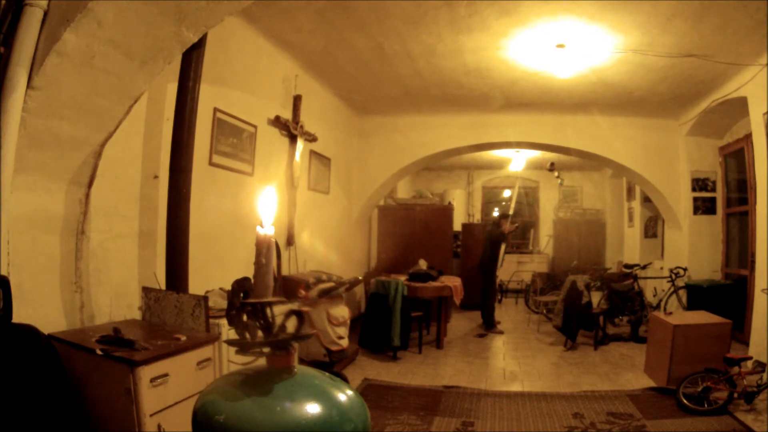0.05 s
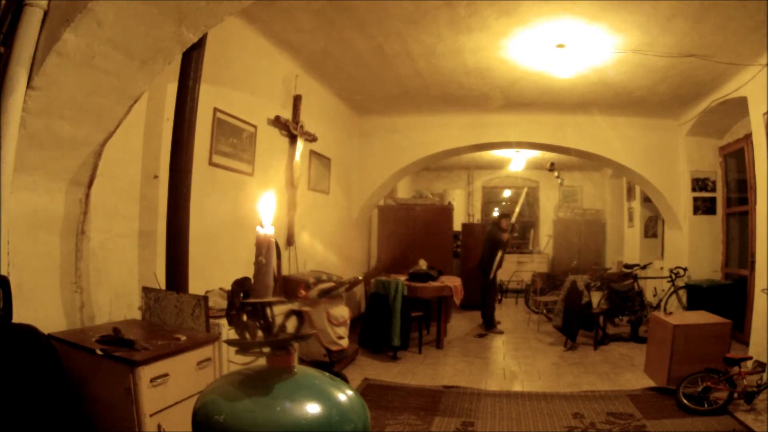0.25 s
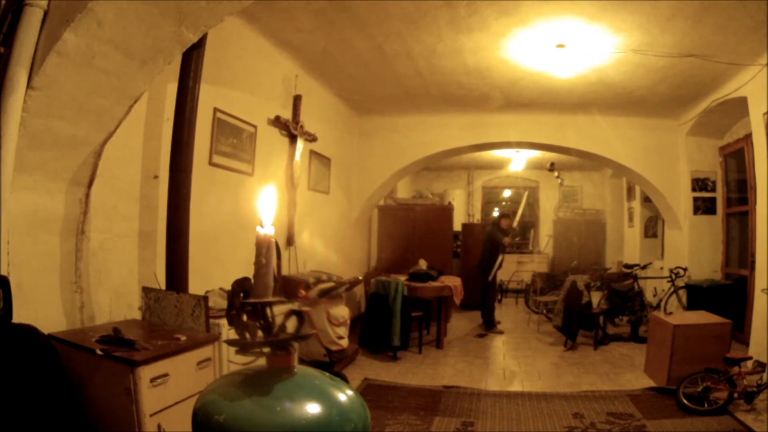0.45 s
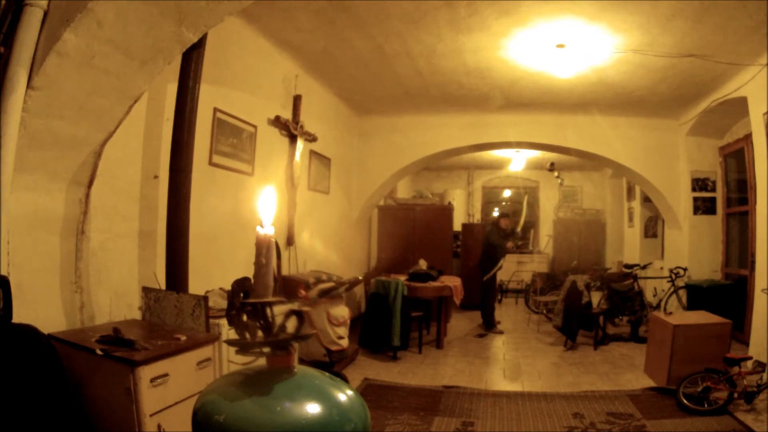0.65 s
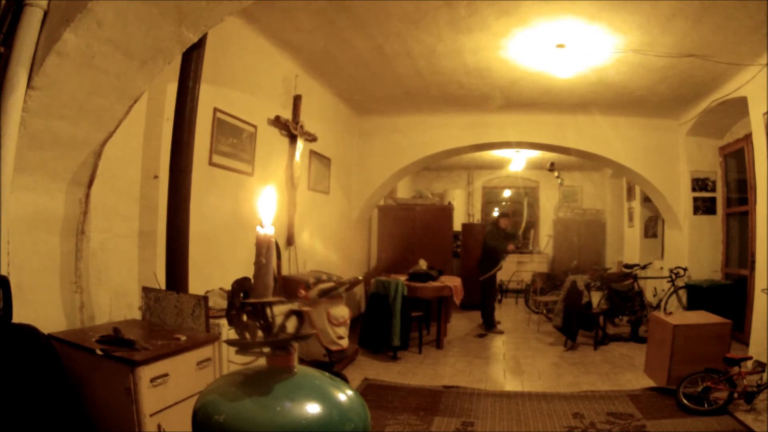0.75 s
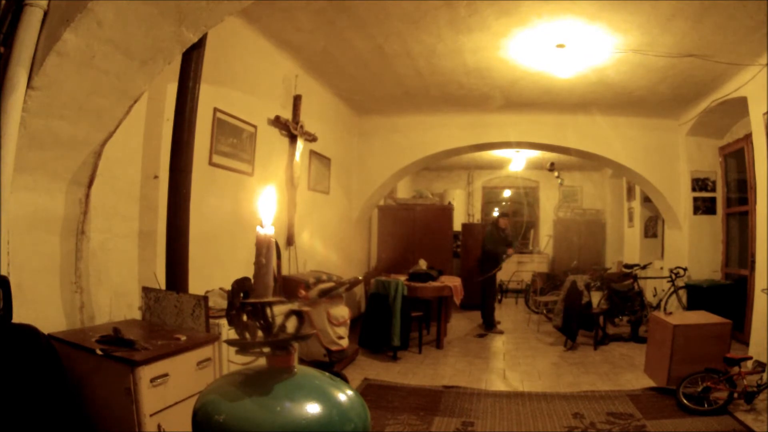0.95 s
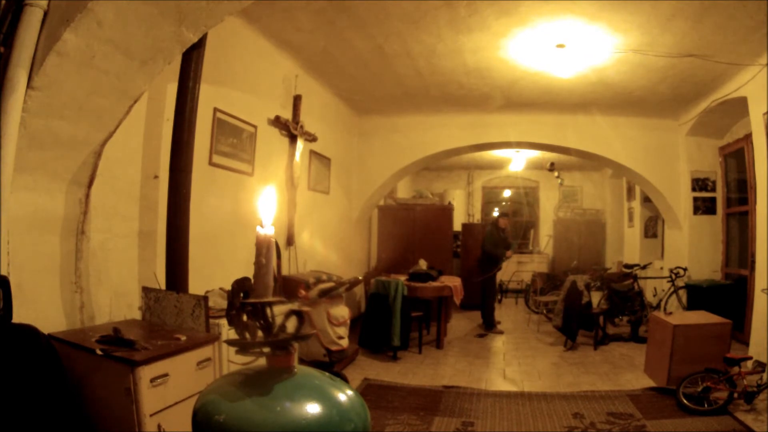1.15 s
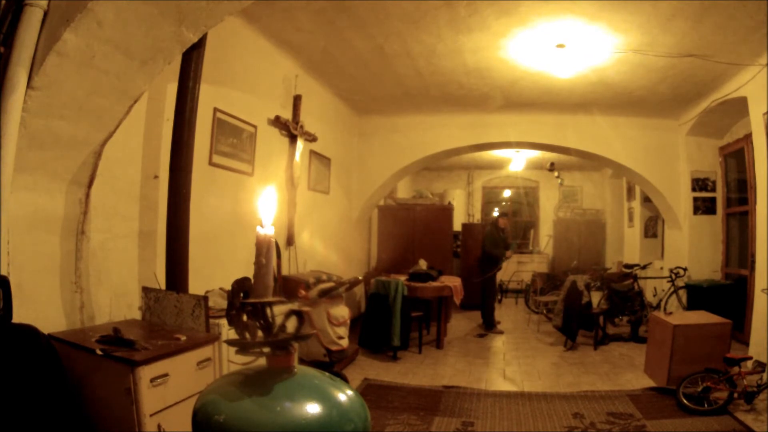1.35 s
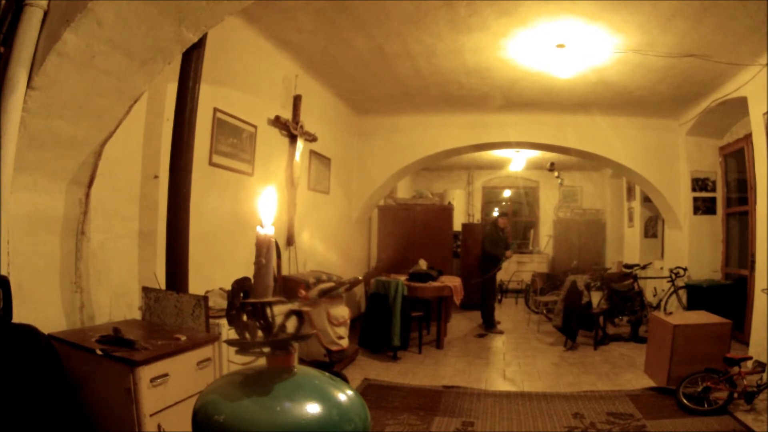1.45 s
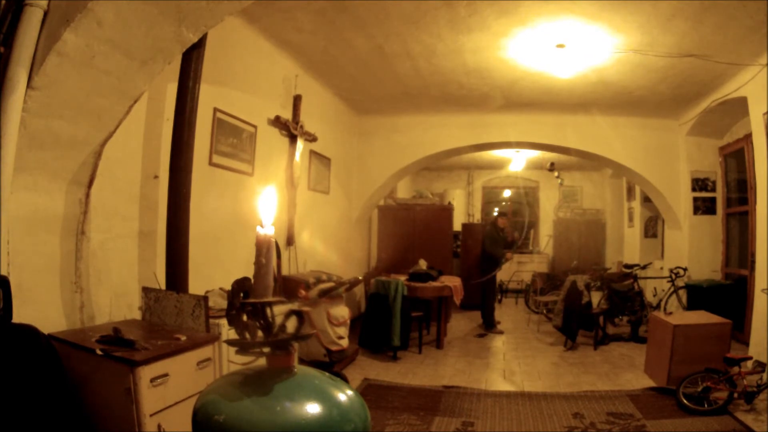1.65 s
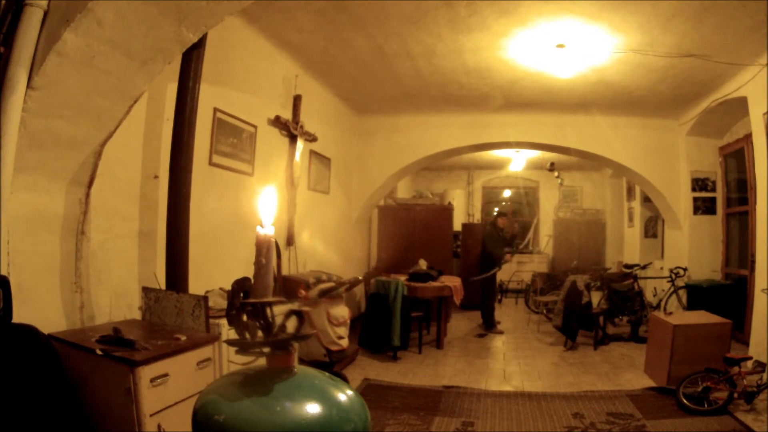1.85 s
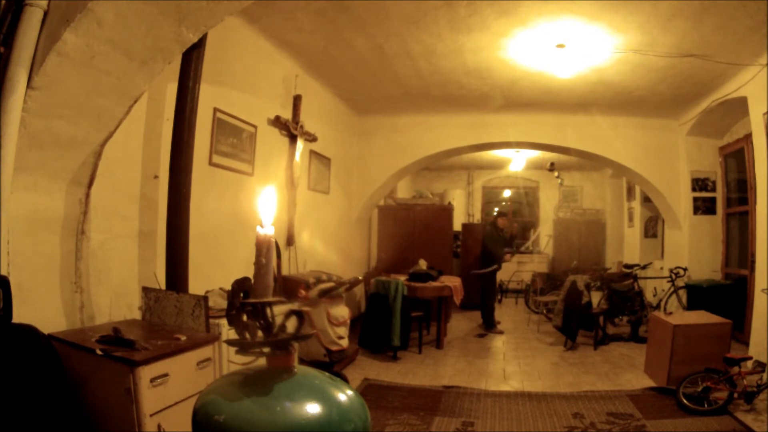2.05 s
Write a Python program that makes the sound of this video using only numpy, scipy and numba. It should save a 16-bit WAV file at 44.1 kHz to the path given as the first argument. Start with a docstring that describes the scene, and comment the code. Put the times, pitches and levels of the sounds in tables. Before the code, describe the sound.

Arrow strike: a soft far bowstring snap, then a loud close woody crack, room echo, faint footfalls and rustling

```python
"""An arrow strikes a target close to the microphone: noise crack, ringing board, echoes of a large stone room.
Before it, the bow at the far end: the arrow scraping along the rest and the string's snap as shaped noise,
limbs and shaft as damped sines. The hit overloads the recorder, whose gain control holds the echo down for a
moment. Then soft footfalls (noise thuds) with a deep wobble (slow sines), and rustling clothes and gear (grainy
noise), over faint steady room noise."""
import sys
import numpy as np
from scipy import signal
from scipy.fft import rfft, irfft
from scipy.io import wavfile
from scipy.ndimage import uniform_filter1d
from numba import njit

SR = 44100
rng = np.random.default_rng(int(sys.argv[2]) if len(sys.argv) > 2 else 0)


def transcribe(signal):
    """Save signal, clipped to [-1, 1], as a 16-bit WAV file at the path in sys.argv[1]."""
    frames = np.atleast_2d(signal).T
    limited = np.clip(frames, -1, 1)
    pcm = np.round(limited * 32767).astype(np.int16)
    wavfile.write(sys.argv[1], SR, pcm)


N = 92610
T = np.arange(N) / SR
FREQS_HZ = np.maximum(np.arange(N // 2 + 1) * SR / N, 1)

HIT_S, TARGET_LOW_HZ = .2315, 60  # the board radiates little below this
CRACK_DB, CRACK_RISE_S, CRACK_HOLD_S, CRACK_T60_S = -3, .0004, .0028, .011
ECHO_DB = -18
ROOM_GAP_S, ROOM_BUILD_S, ROOM_HOLD_S = .003, .0053, .018
# crack spectrum: f/Hz, relative level/dB per Hz
CRACK_SPECTRUM = [(150, -20), (500, -7.5), (1200, -4), (2600, -3.5), (3300, -13), (5200, -12), (10000, -15),
                  (15000, -19)]
# target board modes: f/Hz, level/dB, t60/s
BOARD_MODES = [(108, -23, 0.09), (239, -13, .08), (313, -21, 0.079), (590, -7, .03), (733, -2.5, .03),
               (850, -3, 0.036), (992, -11.5, 0.042), (1460, -5.5, 0.026), (1880, -5.5, .022),
               (2725, -9.5, 0.014), (3690, -15.5, .02), (5179, -9.5, 0.024), (6600, -15, 0.014),
               (10000, -19, .016)]
# hit echo spectrum: f/Hz, relative level/dB per Hz
ECHO_SPECTRUM = [(35, -27.5), (80, -8), (125, -4.5), (170, -6.5), (230, -1.5), (305, -1), (410, -9),
                 (560, -4), (850, -0.5), (940, -8), (1150, -5), (1550, -9.5), (2000, -7.5), (2400, -16),
                 (3300, -19), (5200, -20), (7500, -25.5), (10500, -23.5), (15000, -26)]
# standing waves of the room: f/Hz, level/dB, t60/s
STANDING_WAVES = [(127, -31.5, .55), (241.6, -33, .9), (299.5, -29.5, 0.92), (571, -32.5, 0.52),
                  (753, -33.5, .7)]


def arrow_hit():
    """The point crunches in for a few milliseconds, the board rings and the whole room answers."""
    crack_env = envelope(HIT_S, CRACK_RISE_S, CRACK_HOLD_S, CRACK_T60_S)
    crack = undb(CRACK_DB) * noise(CRACK_SPECTRUM) * crack_env
    board = ring(BOARD_MODES, HIT_S, CRACK_RISE_S)
    highpass = signal.butter(2, TARGET_LOW_HZ, "high", fs=SR, output="sos")
    direct = signal.sosfilt(highpass, crack + board)
    echo = undb(ECHO_DB) * echoes(noise(ECHO_SPECTRUM), HIT_S)
    standing = ring(STANDING_WAVES, HIT_S + ROOM_GAP_S, ROOM_BUILD_S)
    return direct + echo + standing


SLIP_S, SLIP_DB, SLIP_RISE_S, SLIP_T60_S = .053, -41, .0025, .02
LOOSE_S, LOOSE_DB, LOOSE_RISE_S, LOOSE_T60_S = .072, -24.5, .011, .12
BOW_WET_DB, BOW_RING_WET_DB = 2, -3.5
# scrape of the arrow along the rest: f/Hz, relative level/dB per Hz
SLIP_SPECTRUM = [(60, -9), (170, -1), (300, -8.5), (550, -2.5), (900, -12.5), (2200, -9), (4500, -15),
                 (9000, -19.5), (12000, -29), (14500, -22)]
# snap spectrum at the bow: f/Hz, relative level/dB per Hz
SNAP_SPECTRUM = [(35, -28.5), (80, -6), (160, -0.5), (300, -3), (470, 1.5), (620, -11), (1200, -11.5),
                 (1600, -13), (2100, -10), (3000, -16.5), (5300, -15), (8400, -20.5), (10000, -23),
                 (12000, -30), (14500, -26)]
# limbs, string and shaft, before path and room: f/Hz, level/dB, t60/s
LIMB_MODES = [(109, -39.5, .3), (162.4, -38, 0.39), (240, -40.5, .3), (463, -37.5, 0.13), (1950, -36, .08),
              (2440, -40, 0.1), (2980, -41, .06), (3585, -29.5, .06), (5400, -42.5, .05),
              (8440, -33.5, .045)]
# straight path from snap and limbs to microphone: f/Hz, gain/dB
DIRECT_PATH = [(100, -2.5), (300, -8), (900, -9.5), (1600, -5), (2000, 0), (3600, 1), (5000, -0.5),
               (8500, -0.5), (12000, -5), (15000, -1.5)]


def bow():
    """The arrow scrapes along the rest, the string snaps home and rings limbs and shaft; heard direct and via
    the room."""
    slip_env = envelope(SLIP_S, SLIP_RISE_S, LOOSE_S - SLIP_S, SLIP_T60_S)
    slip = undb(SLIP_DB) * slip_env * noise(SLIP_SPECTRUM)
    snap_env = envelope(LOOSE_S, LOOSE_RISE_S, 0, LOOSE_T60_S)
    snap = undb(LOOSE_DB) * snap_env * noise(SNAP_SPECTRUM)
    limbs = ring(LIMB_MODES, LOOSE_S, LOOSE_RISE_S)
    direct = slip + tint(snap + limbs, DIRECT_PATH)
    room_send = undb(BOW_WET_DB) * (slip + snap) + undb(BOW_RING_WET_DB) * limbs
    return direct + reverb(room_send)


STEP_RISE_S, STEP_T60_S, STEP_WET_DB = .0075, .18, -4
SWAY_HZ, SWAY_RISE_S, SWAY_T60_S = 26, .018, 1.65
# soft footfalls: t/s, level/dB
FOOTFALLS = [(1.102, -56.5), (1.269, -40), (1.298, -43.5), (1.366, -51.5), (1.87, -56)]
# thud spectrum: f/Hz, relative level/dB per Hz
THUD_SPECTRUM = [(20, -14), (42, 6.5), (75, -5), (130, -7.5), (230, -12.5), (420, -23), (800, -43),
                 (3000, -61)]
# pushes that set the floor swaying: t/s, level/dB
FLOOR_PUSHES = [(1.105, -48.5), (1.374, -40), (1.84, -46), (1.956, -45)]


def footfalls():
    """Dull noise thuds, and the slow damped sway of the floor."""
    steps = sum(undb(db) * envelope(s, STEP_RISE_S, 0, STEP_T60_S) for s, db in FOOTFALLS)
    thuds = noise(THUD_SPECTRUM) * steps
    sway = sum(ring([(SWAY_HZ, db, SWAY_T60_S)], s, SWAY_RISE_S) for s, db in FLOOR_PUSHES)
    return in_room(thuds, STEP_WET_DB) + sway


RUB_RISE_S, RUB_T60_S, RUB_GRAIN = .0053, .14, .29  # grain: rms of the log gain


def rub(strokes, colour):
    """Grainy friction that swells with each stroke."""
    roughness = unit_rms(uniform_filter1d(rng.standard_normal(N), size=90))  # 2 ms smoothing
    grain = unit_rms(np.exp(RUB_GRAIN * roughness))
    swell = sum(undb(db) * envelope(s, RUB_RISE_S, hold_s, RUB_T60_S) for s, hold_s, db in strokes)
    return noise(colour) * grain * swell


RUB_WET_DB = -.5
# brushes of cloth: t/s, hold/s, level/dB
CLOTH_STROKES = [(1.503, 0.053, -66.5), (1.605, 0.024, -61.5), (1.672, 0.058, -62), (1.755, 0.039, -62)]
# cloth spectrum: f/Hz, relative level/dB per Hz
CLOTH_SPECTRUM = [(300, -24), (1500, -9), (2300, -2.5), (3000, 1), (3600, -1), (4400, 2), (5200, -2.5),
                  (7600, -3.5), (9000, -11), (11000, -21), (13000, -21), (15000, -12.5)]
# scrapes of the archer's gear: t/s, hold/s, level/dB
GEAR_STROKES = [(1.848, 0.026, -57), (1.905, 0.055, -66.5), (1.99, .03, -59.5), (2.06, .04, -71)]
# gear spectrum, before its resonances: f/Hz, relative level/dB per Hz
GEAR_SPECTRUM = [(400, -14), (900, -10), (1250, -5.5), (1900, -9.5), (2400, -6.5), (4500, -10.5),
                 (9300, -14.5), (11000, -21), (13000, -24), (14600, -18)]
# gear resonances: f/Hz, width/Hz, gain on the scrape/dB
GEAR_RESONANCES = [(1200, 200, -8), (2370, 190, 3), (2820, 200, -3)]


def rustle():
    """Sleeves brush, then gear scrapes with a faint ring."""
    cloth = rub(CLOTH_STROKES, CLOTH_SPECTRUM)
    scrape = rub(GEAR_STROKES, GEAR_SPECTRUM)
    rings = sum(undb(db) * resonance(scrape, hz, width) for hz, width, db in GEAR_RESONANCES)
    return in_room(cloth + scrape + rings, RUB_WET_DB)


AIR_DB = -59.5
# still room: f/Hz, relative level/dB per Hz
AIR_SPECTRUM = [(12, -34), (20, 0), (171, -4), (985, -17.5), (1670, -20), (3960, -25), (4810, -25),
                (5850, -35), (6910, -28), (13900, -38), (15500, -37)]


def room_air():
    """Steady coloured noise of the still room."""
    return undb(AIR_DB) * noise(AIR_SPECTRUM)


# reverberation time: f/Hz, t60/s
ROOM_DECAY = [(60, 1.6), (150, .85), (300, 0.91), (700, 0.79), (1500, 0.73), (3000, 0.57), (7000, 0.53),
              (10500, 0.68), (14500, 0.94)]


def echoes(wash, start):
    """Dense echoes: noise that builds up after a gap, each band decaying with its own t60."""
    spectrum = rfft(wash)
    knots = np.log([hz for hz, _ in ROOM_DECAY])
    out = 0
    for weights, (_, t60) in zip(np.eye(len(knots)), ROOM_DECAY):
        band = irfft(spectrum * np.interp(np.log(FREQS_HZ), knots, weights), N)
        out = out + band * envelope(start + ROOM_GAP_S, ROOM_BUILD_S, ROOM_HOLD_S, t60)
    return out


def reverb(x):
    """What the room returns of a sound: convolution with a unit-energy echo response."""
    response = unit_rms(echoes(rng.standard_normal(N), 0)) / np.sqrt(N)
    return signal.fftconvolve(x, response)[:N]


def in_room(x, wet_db):
    """A source and its reverberation."""
    return x + undb(wet_db) * reverb(x)


def undb(db):
    """Decibels to gain."""
    return 10 ** (np.asarray(db) / 20)


def unit_rms(x):
    """Scale to rms 1."""
    return x / np.sqrt(np.mean(x ** 2))


def along(points, hz):
    """Read (Hz, value) points on a log-frequency axis."""
    f, v = np.array(points, float).T
    return np.interp(np.log(hz), np.log(f), v)


def tint(x, colour):
    """Filter a sound by a spectrum in dB."""
    return irfft(rfft(x) * undb(along(colour, FREQS_HZ)), N)


def noise(colour):
    """Noise of rms 1 with the given spectrum."""
    return unit_rms(tint(rng.standard_normal(N), colour))


def resonance(x, hz, width):
    """One resonance, gain 1 at its centre."""
    return signal.lfilter(*signal.iirpeak(hz, hz / width, fs=SR), x)


def fade(age, t60):
    """Exponential decay from age 0, -60 dB at t60."""
    return np.exp(-np.log(1000) * np.maximum(age, 0) / t60)


def envelope(start, rise, hold, t60):
    """Linear attack, hold and exponential release; all in s."""
    return np.clip((T - start) / rise, 0, 1) * fade(T - start - rise - hold, t60)


def ring(modes, start, rise):
    """Damped sine modes set going at one moment, alternating in sign."""
    out = 0
    for k, (hz, db, t60) in enumerate(modes):
        sine = np.sin(2 * np.pi * hz * (T - start))
        out = out + (-1) ** k * undb(db) * sine * envelope(start, rise, 0, t60)
    return out


def scene():
    """Hit, shot and the archer's movements in a quiet room."""
    return (arrow_hit() + bow() + footfalls() + rustle() + room_air())[None]


@njit
def follow(x, attack, release):
    """Level follower that rises fast and falls slowly; coefficients per sample."""
    out, e = np.empty(len(x)), 0.
    for i in range(len(x)):
        e += (x[i] - e) * (attack if x[i] > e else release)
        out[i] = e
    return out


LIMIT_DB, GAIN_ATTACK_S, GAIN_RELEASE_S, RATIO = -13.5, .0086, .3, 3.5
TOP_HZ = 15250
# treble dips of a filter after the overload: f/Hz, width/Hz, depth/0-1
FILTER_DIPS = [(6000, 1300, .8), (12000, 650, 1), (12100, 2000, .4)]


def record(dry):
    """Gain control ducks too late for the hit, which clips; then a filter's treble dips and a top cutoff."""
    level = follow(np.abs(dry[0]), 1 / (GAIN_ATTACK_S * SR), 1 / (GAIN_RELEASE_S * SR))
    gain = np.minimum(1, undb(LIMIT_DB) / (level + 1e-9)) ** (1 - 1 / RATIO)
    x = np.clip(dry[0] * gain, -1, 1)
    for hz, width, depth in FILTER_DIPS:
        x = x - depth * resonance(x, hz, width)
    lowpass = signal.ellip(10, .2, 70, TOP_HZ, fs=SR, output="sos")
    return signal.sosfilt(lowpass, x)[None]


dry = scene()
out = record(dry)
transcribe(out)
```